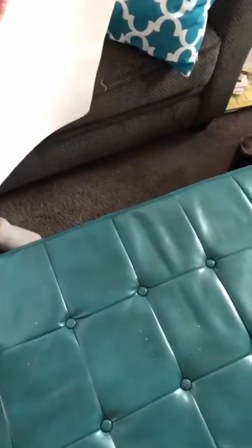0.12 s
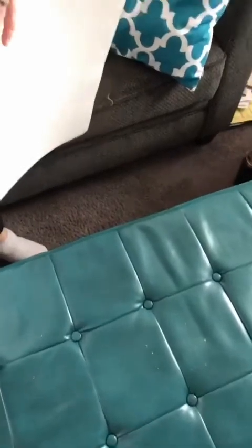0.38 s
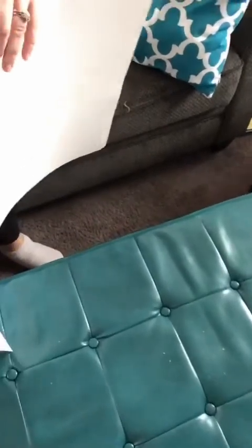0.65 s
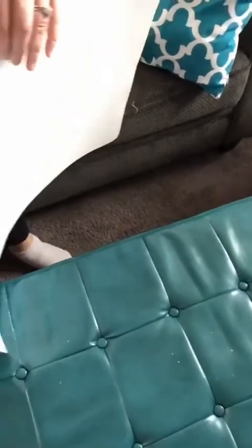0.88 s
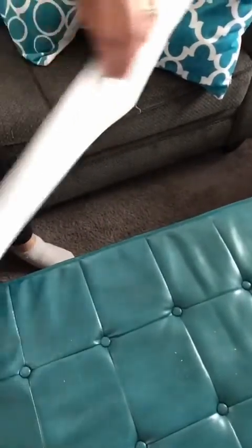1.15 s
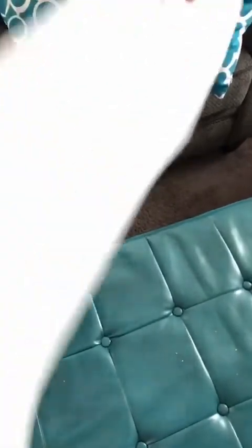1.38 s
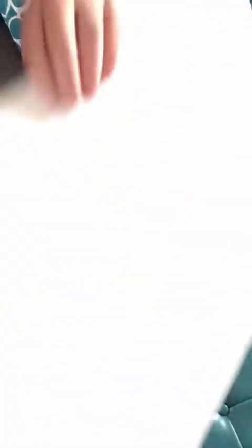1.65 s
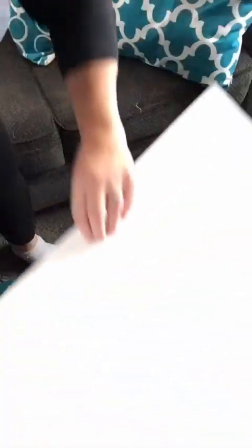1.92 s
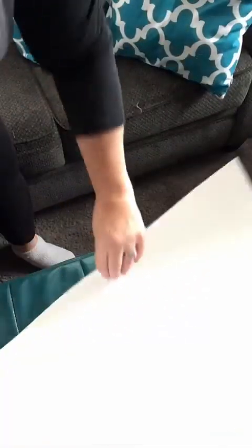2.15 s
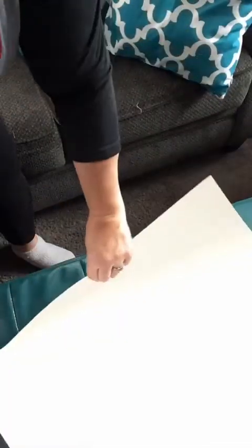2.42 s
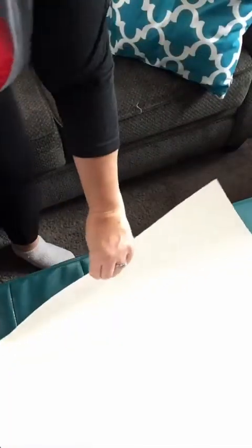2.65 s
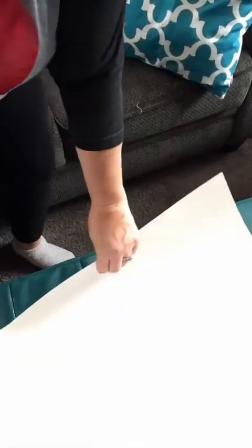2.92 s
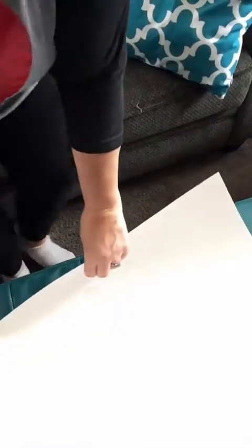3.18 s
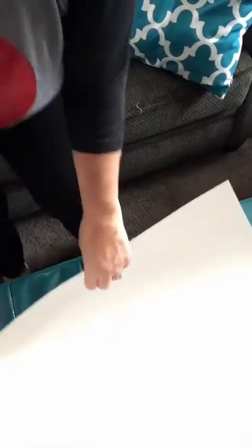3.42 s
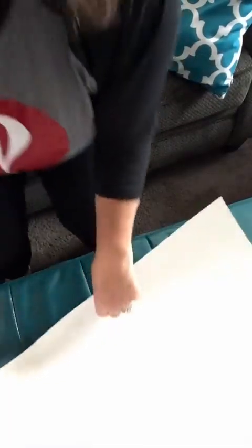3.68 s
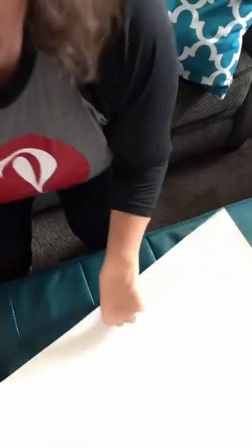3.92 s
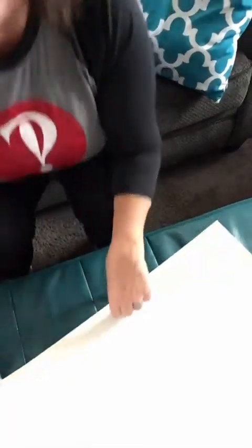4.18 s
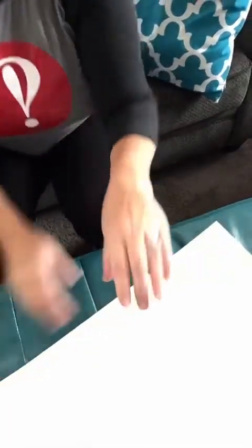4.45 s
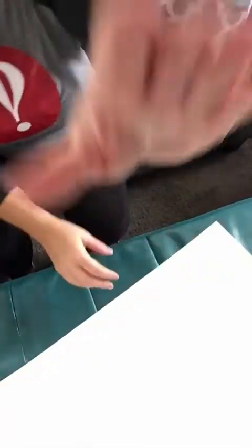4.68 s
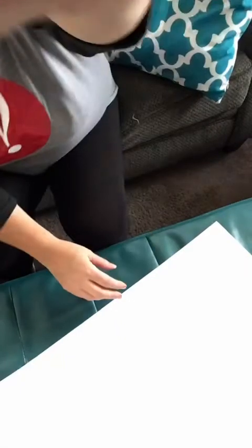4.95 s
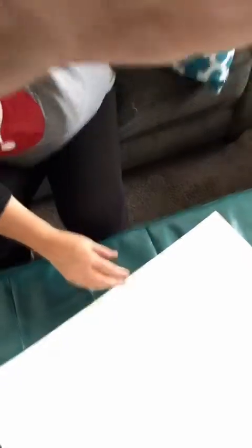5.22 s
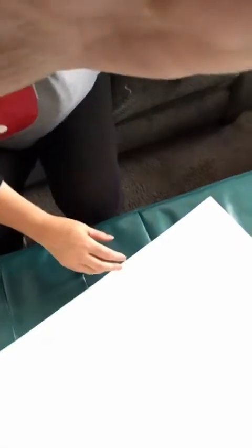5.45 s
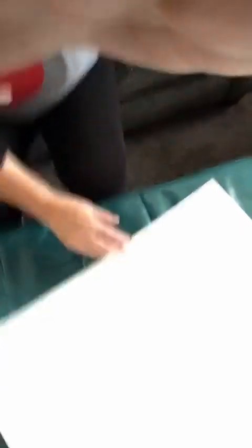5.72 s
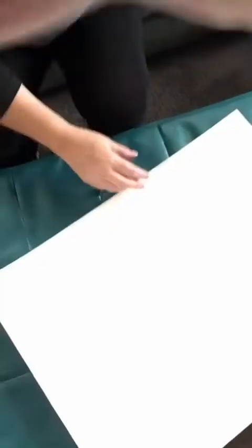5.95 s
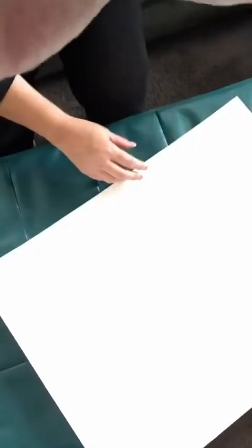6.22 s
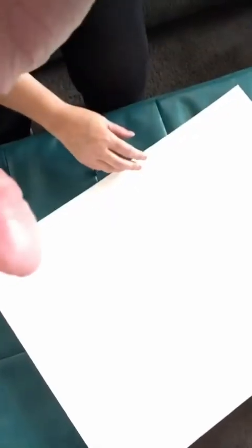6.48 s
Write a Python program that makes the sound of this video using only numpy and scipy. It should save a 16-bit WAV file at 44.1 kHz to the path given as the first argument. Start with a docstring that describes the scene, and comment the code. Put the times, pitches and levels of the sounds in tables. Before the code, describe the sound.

Close handling ticks open over faint mains hum. Stiff paper flexes with dull, boomy flaps and papery flutter, lands, and is dragged and pressed on a vinyl surface with dry, uneven swishes that fade. Later the holder of the small handheld microphone is gripped: thuds, hard ringing plastic-like cracks, rubbing and a rapid stuttering creak, by far the loudest moments. The furnished room is dry, with hardly any tail.

```python
"""A mains hum throbs below while the recorder's holder ticks and a large stiff sheet of paper swings over.
The sheet wobbles: buckles ring its bending modes. It slides flat across padded vinyl: friction grains, coloured.
Then fingers grip the holder: it snaps (ringing noise volleys), thumps (dying sines) and creaks (knocked joint),
and skin rubs the casing (bright grains over low lumps). Carpeted room: hum, rumble, hiss and a faint dull tail."""
import sys
import numpy as np
from scipy import signal
from scipy.fft import rfft, irfft
from scipy.io import wavfile
from scipy.ndimage import uniform_filter1d, map_coordinates

SR = 44100
rng = np.random.default_rng(int(sys.argv[2]) if len(sys.argv) > 2 else 0)


def bounce(signal):
    """Save signal as a 16-bit WAV file at the path given by the first command-line argument."""
    frames = np.transpose(np.atleast_2d(signal))
    limited = np.clip(frames, -1, 1)
    pcm = np.round(limited * 32767).astype(np.int16)
    wavfile.write(sys.argv[1], SR, pcm)


N = 290879   # length in samples

# flaps of the sheet, long rows are its settling: start t/s, hold t/s, deep wobble level/dB,
# flutter over wobble level/dB
FLAPS = [(0.175, .02, -77.5, 6.5), (0.207, 0.022, -71.5, -5), (0.942, 0.016, -64, -14),
         (1.075, 0.012, -65, 2), (1.11, .03, -66, -4), (1.166, 0.042, -59, -1), (1.203, 0.028, -56, -4),
         (1.266, 0.044, -56, -7), (1.305, .012, -60, -1), (1.322, 0.04, -60, 5), (1.367, 0.061, -53.5, -3),
         (1.473, 0.016, -48.5, -7), (1.512, 0.02, -50.5, -4), (1.56, 0.045, -54, -8.5),
         (1.632, 0.018, -48, -1), (1.67, 0.034, -53.5, 2.5), (1.709, 0.022, -53.5, 0),
         (1.725, 0.054, -54.5, 3), (1.794, 0.026, -54, -15), (1.878, 0.03, -57, -10),
         (1.916, 0.015, -56, -9), (1.958, 0.025, -60, -8.5), (2.036, 0.029, -58, -15),
         (2.119, 0.072, -60.5, -11.5), (2.217, 1.95, -71, -6), (2.341, 0.013, -62.5, -10),
         (2.75, 0.082, -64, -11), (3.46, 0.13, -72.5, 3.5), (3.702, 0.13, -72.5, 3),
         (4.113, 0.03, -58, -13), (4.155, 0.27, -71.5, -35), (4.684, 0.32, -70, -22)]
# bending resonances of the sheet before they glide, deep and high: f/Hz, width f/Hz, level/dB
SHEET_DEEP = [(108.5, 38, -5), (202, 116, -3), (285, 55, 2), (403, 95, -2.5)]
SHEET_HIGH = [(466, 93, -0.5), (632, 120, 4.5), (842, 254, -3.5), (1100, 175, -7), (1500, 360, -24)]
# strokes on vinyl, the long row is the steady drag: start t/s, hold t/s, scuff level/dB,
# swish over scuff level/dB
STROKES = [(1.59, 0.008, -64, -7), (1.782, 0.049, -78.5, 11), (1.918, 0.066, -69.5, -2),
           (2.063, 1.95, -69, -6), (2.063, 0.024, -82, 12), (2.145, 0.025, -77, -16),
           (2.242, 0.028, -63.5, -2.5), (2.344, 0.021, -57.5, -7), (2.403, 0.037, -70, 8),
           (2.465, 0.022, -57, -5.5), (2.566, 0.09, -64, -6), (2.706, 0.023, -63, -8),
           (2.982, 0.071, -67.5, -9), (3.257, 0.017, -72, -2.5), (3.379, 0.033, -66.5, -3.5),
           (3.46, 0.13, -65, -8.5), (3.614, 0.013, -70, 4), (3.699, 0.067, -63, 1.5),
           (3.777, .08, -66.5, -1), (4.085, 0.028, -63.5, 1), (4.152, 0.76, -85, 0.5)]
# colours of the scuff and the brighter swish before they glide: f/Hz, width f/Hz, level/dB
SCUFF = [(640, 300, -10), (1070, 500, -3), (1380, 540, 0), (1950, 320, 5), (2620, 480, 4.5),
         (3050, 300, -3)]
SWISH = [(4120, 400, 2), (4940, 130, -7), (5600, 450, -3), (6900, 900, -6)]
# ticks and snaps: t/s, middle level/dB, low over middle level/dB, bright over middle level/dB,
# length t/ms before each band's stretch
SNAPS = [(0.2656, -47, 2.5, -4, 10.4), (0.389, -69, -5, 1, 7.2), (0.433, -58.5, -1.5, -6, 6.8),
         (0.505, -57, -28, -12, 8.2), (0.5151, -54.5, -5, -8, 12), (0.544, -66, 2, -8, 6.5),
         (0.6644, -62, 2, -29, 9), (0.682, -69, 10, -15, 8), (1.0807, -85, 14, -2.5, 3.1),
         (1.264, -68, 13, -15, 4), (1.472, -63, 12, -18, 4.3), (1.517, -64, 13, -15, 4),
         (1.59, -59, -8, -3, 10), (1.635, -58, 12, -18, 3.5), (1.885, -58, 2, -7, 4),
         (1.89, -60, -5, -7, 12), (1.913, -67, 16, -5, 3.9), (1.965, -63, 4, -12, 8),
         (2.047, -68, 12, -10, 5), (2.094, -58, -1, -26, 11), (2.4122, -74, -18, 24.5, 3),
         (2.769, -67.5, 11.5, -13, 4), (3.25, -66, 0, -15, 8), (3.4656, -59, 1, -16, 6.4),
         (3.55, -66, 5, -15, 8), (3.588, -67, 6, -15, 6), (4.107, -72, 4, 11, 6.5), (5.106, -64, 0, 3, 3),
         (5.114, -53, 3, 4, 3), (5.135, -45, 1, -5, 3.3), (5.1402, -36, -12, 3, 2.3),
         (5.162, -36, -10, -1, 4.3), (5.212, -50, -2, -3, 8), (5.2188, -35, -10, 6, 2.5),
         (5.2207, -28, -3, 5.5, 7), (5.2252, -33, -3, 3, 5), (5.2335, -38, -1, -4, 7.6),
         (5.294, -62, 3, -20, 6), (5.3015, -49, 5, -18, 8), (5.5688, -45, 3, -5, 2.5),
         (5.572, -34.5, -2, -12, 6), (5.5712, -50, -10, 4, 1.5), (5.69, -36, 1.5, -7, 3),
         (5.694, -33.5, -12, 6, 4.5), (5.724, -39, -10, -15, 7), (5.7418, -44, -8, -20, 4.6),
         (5.9195, -50, 0, 4.5, 2.5), (6.2239, -63, 10, -9, 5), (6.35, -60, 6, -8, 8)]
# edges between the low, middle, bright and top bands of a snap: f/Hz
SNAP_EDGES = [250, 900, 2500, 6500, 12000]
# casing resonances: f/Hz, width f/Hz, level/dB
CASING = [(345, 990, -11), (668, 220, 4), (951, 460, -0.5), (1400, 450, 10), (1950, 310, 5.5),
          (3090, 140, -12.5), (4060, 130, -5.5), (5760, 490, -0.5), (6960, 340, -10), (7770, 500, 1.5),
          (9700, 1100, -8.5), (12500, 2500, -20)]
# single notes out of a tick of the holder or a buckle of the sheet: t/s, peak level/dB, f/Hz, t60 t/ms
RINGS = [(0.128, -65, 755, 65), (0.16, -65, 2600, 8), (0.266, -45, 1500, 13), (0.292, -61, 500, 13),
         (0.435, -60, 2070, 8), (0.5062, -49, 1980, 18), (0.5145, -52, 1000, 12), (0.5145, -52, 2050, 14),
         (0.5205, -50, 2160, 22), (0.507, -61, 4300, 14), (0.516, -65, 4300, 30), (.437, -62, 4300, 10),
         (0.5195, -49, 694, 32), (0.665, -48.5, 759, 23), (0.664, -58, 1530, 16), (0.797, -63, 760, 36),
         (0.811, -62, 770, 36), (1.08, -56, 620, 50), (1.2, -47, 300, 110), (1.484, -45, 280, 40),
         (1.513, -43, 205, 90), (1.52, -48, 640, 70), (1.633, -43, 630, 60), (1.709, -44, 290, 110),
         (1.797, -49, 305, 70), (1.917, -50, 400, 40), (3.9445, -51, 2750, 7), (3.9445, -54, 1950, 8),
         (4.103, -56, 2400, 40), (5.2203, -28, 5560, 16), (5.2225, -28, 4320, 16), (5.2215, -33, 3400, 20),
         (5.226, -33, 2105, 25), (5.226, -31, 6280, 16), (5.2205, -33, 8085, 12), (5.223, -35, 938, 42),
         (5.2217, -21, 6960, 21), (5.224, -35, 730, 35), (5.224, -36, 1238, 30), (5.222, -41, 13200, 12),
         (5.222, -33, 9700, 18), (5.5726, -33.5, 4430, 13), (5.5715, -38, 1435, 25), (5.573, -40, 646, 25),
         (5.57, -42, 3200, 9), (5.5725, -41, 2900, 12), (5.5735, -34, 1950, 17), (5.573, -37, 330, 40),
         (5.5725, -50, 8100, 13), (5.6935, -29.5, 1867, 34), (5.6945, -23.5, 5800, 6.9),
         (5.6945, -22, 9550, 5.4), (5.694, -27, 12200, 5), (5.6965, -32, 8200, 8), (5.6945, -35, 4000, 9),
         (5.92, -47.5, 5500, 9)]
# the creak, slip by slip: t/s, peak level/dB
SLIPS = [(5.7689, -43), (5.7763, -39), (5.7865, -32.5), (5.8033, -34), (5.8116, -34), (5.8202, -33.5),
         (5.83, -30), (5.837, -30.5), (5.8467, -37)]
# resonances of the creaking joint: f/Hz, width f/Hz, level/dB
JOINT = [(1080, 390, 1), (1870, 240, 6), (3050, 440, -3), (4000, 710, -10), (5500, 580, -4),
         (7140, 1100, -18), (8250, 490, -6), (12000, 3300, -22)]
# skin rubbing the casing: start t/s, hold t/s, rub level/dB, case rumble over rub level/dB
RUBS = [(.213, .025, -70, -10), (5.116, 0.025, -53.5, -3), (5.133, 0.0092, -46, 6), (5.166, .004, -47, -9),
        (5.18, 0.023, -49, -8), (5.109, .006, -67, -3), (5.228, 0.037, -68, 11.5),
        (5.336, 0.038, -63.5, -18), (5.678, .012, -64, -6), (5.693, 0.02, -50, 1),
        (5.723, 0.036, -55.5, -4), (5.784, 0.064, -58.5, 5), (5.866, 0.02, -72, -6),
        (5.892, 0.032, -64, 2.5)]
# colours of the rub: f/Hz, width f/Hz, level/dB
SKIN = [(6500, 510, -9.5), (8820, 700, -2), (10600, 810, -1.5)]
# low pushes on the casing: t/s, level/dB before the decay, f/Hz
THUMPS = [(0.267, -37.5, 255), (5.114, -43, 124), (5.126, -33, 130), (5.141, -28, 88.5), (5.705, -39, 85),
          (5.838, -41.5, 116)]
# levels of the mains hum and the low rumble, rising and falling: t/s, hum level/dB, rumble level/dB
HUM = [(0, -69.5, -74), (0.7, -71, -73), (1.1, -66.5, -84), (2.0, -63.5, -71), (4.0, -64.5, -70),
       (4.4, -63.5, -68), (4.9, -63, -74.5), (5.351, -73, -72.5), (5.8, -68.5, -64), (5.999, -72, -84),
       (6.3, -63.5, -67.5), (6.6, -76.5, -69.5)]
# room modes that gather the rumble: f/Hz, width f/Hz, level/dB
ROOM_MODES = [(62, 29, -5), (77.4, 10, 4.5), (100.3, 40, -7)]
# colour of the hiss, only its shape counts: f/Hz, level/dB (per Hz)
HISS = [(82, -41.5), (140, -8.5), (178, -8.5), (363, -16.5), (460, -21), (698, -23), (1120, -26),
        (1420, -25.5), (1880, -27), (12100, -37), (16000, -44)]


def wobble():
    """Small buckles run through the flexing sheet and ring its bending modes."""
    _, _, deep_db, flutter_db = np.transpose(FLAPS)
    rise, fall = 2200, 455   # dB/s
    deep_gain = swells(FLAPS, deep_db, rise, fall)
    flutter_gain = swells(FLAPS, deep_db + flutter_db, rise, fall)
    buckles = grains(2500 * from_db(2.0 * drift(25)), spread_db=0.5)
    # the modes wander a little up and down in pitch
    deep_modes = gliding(resonate(buckles, SHEET_DEEP), share=0.03, rate=6)
    high_modes = gliding(resonate(buckles, SHEET_HIGH), share=0.03, rate=6)
    deep = evened(band(deep_modes, 77, 380), 0.18)
    flutter = evened(band(high_modes, 470, 1800), 0.019)
    heave = rms_one(band(rng.standard_normal(N), 45, 110))   # air pushed by the sheet
    return deep_gain * (deep + from_db(-13.5) * heave) + flutter_gain * flutter


def wandering_colours(friction, modes):
    """Each colour of the friction comes and goes, and its pitch wanders a little up and down."""
    out = 0
    for k, mode in enumerate(modes):
        level = from_db(2.5 * drift(5))
        out = out + (-1) ** k * level * gliding(resonate(friction, [mode]), share=0.02, rate=4)
    return out


def slide():
    """Dense friction grains take on wandering colours, with a broad rub under the swish."""
    _, _, scuff_db, swish_db = np.transpose(STROKES)
    treble_db = -8 + 0.98 * swish_db   # over the scuff, following the swish
    rise, fall = 396, 294   # dB/s
    scuff_gain = swells(STROKES, scuff_db, rise, fall)
    swish_gain = swells(STROKES, scuff_db + swish_db, rise, fall)
    treble_gain = swells(STROKES, scuff_db + treble_db, rise, fall)
    friction = grains(9000, spread_db=1.5) * from_db(2.2 * drift(22))
    scuff = evened(wandering_colours(friction, SCUFF), 0.07)
    broad_rub = band(grains(9000, spread_db=2.5), 4200, 8500)
    swish = evened(wandering_colours(friction, SWISH) + 0.14 * broad_rub, 0.026)
    treble = rms_one(band(friction, 6100, 16300))
    crackle = rms_one(band(grains(350, spread_db=5.0), 350, 3000))   # fibres catch and let go
    return scuff_gain * (scuff + from_db(-15) * crackle) + swish_gain * swish + treble_gain * treble


def snaps():
    """Each snap is a volley of cracks that builds up, peaks and dies; lows peak later and last longer."""
    size, lead = 3000, 600   # samples in a volley, and before its nominal time
    out, t = np.zeros(N + size), np.arange(-lead, size - lead) / SR
    # one row per band, low to top
    stretch = np.array([[1.25], [1.1], [0.85], [0.75]])
    lag_s = np.array([[0.003], [0.002], [0.0015], [0.0015]])
    cuts = []
    for low, high in zip(SNAP_EDGES, SNAP_EDGES[1:]):
        narrow = signal.butter(2, [low, high], "band", fs=SR, output="sos")
        wide = signal.butter(2, [low / 2, high * 1.27], "band", fs=SR, output="sos")
        cuts.append(np.vstack([narrow, wide]))
    for s, middle_db, low_db, bright_db, length_ms in SNAPS:
        age = (t - lag_s) * 1000 / (max(length_ms, 1) * stretch)
        build_up = np.exp(3.03 * np.minimum(age, 0))
        decay = np.exp(-2.5 * np.maximum(age, 0))
        shapes = np.where(age < 0, build_up, decay)
        unevenness = from_db(1.5 * rng.standard_normal(150).repeat(20))
        cracks = rng.standard_normal(size) * unevenness
        # each snap finds the modes at new levels
        struck = np.add(CASING, rng.normal(0, 2.5, (len(CASING), 1)) * [0, 0, 1])
        rung = 0.41 * shapes * cracks + resonate(shapes * cracks, struck)
        band_db = (low_db, 0, bright_db, -4 + 1.23 * bright_db)
        at = round(s * SR) - lead
        for x, shape, cut, level_db in zip(rung, shapes, cuts, band_db):
            part = rms_one(signal.sosfilt(cut, x)) / rms_one(shape).max()
            out[at:at + size] += from_db(middle_db + level_db) * part
    return out[:N]


def rings():
    """A ring swells over a few cycles and dies, a little unsteady."""
    size = 2000
    out, t = np.zeros(N + size), np.arange(size) / SR
    for s, peak_db, hz, t60_ms in RINGS:
        swell = (1 - np.exp(-t * hz / 1.2)) ** 2   # 1.2 cycles
        shape = swell * from_db(-60000 * t / max(t60_ms, 1))
        jitter = uniform_filter1d(uniform_filter1d(rng.standard_normal(size), 40), 40)
        waver = 4 * np.cumsum(jitter) / np.sqrt(size)   # a walk of some 4 rad over the window
        tone = np.sin(2 * np.pi * (hz * t + rng.random()) + waver)
        at = round(s * SR)
        out[at:at + size] += from_db(peak_db) * shape / shape.max() * tone
    return out[:N]


def creak():
    """Stick and slip in the holder: each slip is a double knock on the joint amid sparse weaker ones."""
    size = 600
    out, t = np.zeros(N), np.arange(size) / SR
    for s, peak_db in SLIPS:
        knocks = 0.2 * rng.standard_normal(size) * np.exp(-t / 0.0012) * (rng.random(size) < 0.3)
        knocks[[0, round(0.0004 * SR)]] += [0.6, 1]   # the main knock comes 0.4 ms after the first
        # the joint shifts between slips
        joint = np.multiply(JOINT, 1 + rng.normal(0, 0.02, (len(JOINT), 1)) * [1, 0, 0])
        rung = resonate(knocks, joint)
        at = round(s * SR)
        out[at:at + size] += from_db(peak_db) * rung / np.abs(rung).max()
    return out


def grip():
    """Skin drags on the casing, bright and dense, and pushes it with low lumps."""
    friction = grains(15000, spread_db=2.5) * from_db(2.0 * drift(80))
    broad = 0.84 * band(friction, 506, 2600) + band(friction, 1500, 7900)
    coloured = resonate(friction, SKIN) + 0.4 * resonate(friction, CASING)
    rub = rms_one(broad + coloured)
    lumps = rms_one(band(rng.standard_normal(N), 50, 220))
    _, _, rub_db, lump_db = np.transpose(RUBS)
    rise, fall = 2495, 802   # dB/s
    rub_gain = swells(RUBS, rub_db, rise, fall)
    lump_gain = swells(RUBS, rub_db + lump_db, rise, fall)
    return rub_gain * rub + lump_gain * lumps


def thumps():
    """A push bends the casing for a cycle or two."""
    size = 4000
    out, t = np.zeros(N + size), np.arange(size) / SR
    for s, level_db, hz in THUMPS:
        at = round(s * SR)
        out[at:at + size] += from_db(level_db) * np.sin(2 * np.pi * hz * t) * np.exp(-t * hz / 1.2)
    return out[:N]


def walls(x):
    """A short dull tail from soft furnishings."""
    t = np.arange(SR // 4) / SR
    decay = from_db(-60 * t / 0.16) * (t > 0.004)   # t60 0.16 s after a 4 ms gap
    tail = band(rng.standard_normal(len(t)), 200, 4500) * decay
    return signal.fftconvolve(x, tail / np.sqrt(np.sum(tail ** 2)))[:N]


def room():
    """Evenly throbbing mains hum, low rumble of the house and nearly steady hiss."""
    t = np.arange(N) / SR
    phase = 2 * np.pi * 119.9 * t
    throb = 1 + 0.12 * np.cos(2 * np.pi * (t - 4.168) / 0.5084)   # period 0.5084 s, a peak at 4.168 s
    s, hum_db, rumble_db = np.transpose(HUM)
    hum_gain = from_db(np.interp(t, s, hum_db) + 1.4 * drift(4.9))
    hum = np.sqrt(2) * hum_gain * throb * (np.sin(phase) + from_db(-20.5) * np.sin(2 * phase))
    rumble_gain = from_db(np.interp(t, s, rumble_db) - drift(5.7))
    rumble = rms_one(resonate(band(rng.standard_normal(N), 50, 130), ROOM_MODES))
    hz = np.maximum(np.fft.rfftfreq(N, 1 / SR), 1)
    knot_hz, knot_db = np.transpose(HISS)
    colour_db = np.interp(np.log(hz), np.log(knot_hz), knot_db)
    hiss = rms_one(irfft(rfft(rng.standard_normal(N)) * from_db(colour_db), N))
    return hum + rumble_gain * rumble + from_db(-70 + 0.24 * drift(1.0)) * hiss


def from_db(db):
    """Gain of a level."""
    return 10 ** (np.asarray(db) / 20)


def rms_one(x):
    """Scale to unit rms."""
    return x / np.sqrt(np.mean(x ** 2) + 1e-20)


def band(x, low_hz, high_hz):
    """Butterworth band-pass."""
    return signal.sosfilt(signal.butter(2, [low_hz, high_hz], "band", fs=SR, output="sos"), x + 1e-18)


def resonate(x, modes):
    """Parallel resonances, signs alternating."""
    out = 0
    for k, (hz, width, level_db) in enumerate(modes):
        r = np.exp(-np.pi * width / SR)
        poles = [1, -2 * r * np.cos(2 * np.pi * hz / SR), r * r]
        zeros = [(1 - r * r) / 2, 0, (r * r - 1) / 2]
        out = out + (-1) ** k * from_db(level_db) * signal.lfilter(zeros, poles, x + 1e-18)
    return out


def drift(rate):
    """Slow random wander of unit rms: noise through two equal low-pass poles at rate in Hz."""
    r = np.exp(-2 * np.pi * rate / SR)
    noise = rng.standard_normal(N + SR)
    return rms_one(signal.lfilter([1], [1, -2 * r, r * r], noise)[SR:])   # drop the filter's first second


def grains(per_s, spread_db):
    """Random clicks of uneven size and either sign."""
    sizes = from_db(spread_db * np.minimum(rng.exponential(1, N), 5)) * rng.choice([-1, 1], N)
    return sizes * (rng.random(N) < per_s / SR)


def gliding(x, share, rate):
    """Read at a randomly wandering speed, so that every colour glides up and down by a typical share."""
    at = np.cumsum(1 + share * drift(rate))
    return map_coordinates(x, [at % (N - 1)], order=3)


def evened(x, seconds):
    """Colour and grain stay, slow swells of level go."""
    return x / np.sqrt(uniform_filter1d(x ** 2, round(seconds * SR)) + 1e-20)


def swells(rows, levels_db, rise_db_per_s, fall_db_per_s):
    """Each row rises to its start, holds and falls; powers add."""
    t, power = np.arange(0, N + 32, 32) / SR, 0   # every 32 samples
    for (s, hold_s, *_), level_db in zip(rows, levels_db):
        before_s, after_s = np.maximum(s - t, 0), np.maximum(t - s - hold_s, 0)
        under_db = rise_db_per_s * before_s + fall_db_per_s * after_s
        power = power + from_db(level_db - under_db) ** 2
    return np.interp(np.arange(N) / SR, t, np.sqrt(power))


def scene():
    """All sources at one microphone."""
    hits = snaps() + rings() + creak()
    sheet = wobble() + slide()
    return (sheet + hits + from_db(-31) * walls(hits) + thumps() + grip() + room())[None]


def top_cut(x):
    """Nothing passes above the cut-off."""
    return signal.sosfilt(signal.butter(12, 16500, fs=SR, output="sos"), x)


def record(dry):
    """Bass and top cut of a small microphone."""
    bass_cut = signal.sosfilt(signal.butter(4, 48, "high", fs=SR, output="sos"), dry)
    mix = signal.sosfilt(signal.cheby2(10, 60, 16600, fs=SR, output="sos"), bass_cut)
    return top_cut(mix)


dry = scene()
out = record(dry)
bounce(out)
```